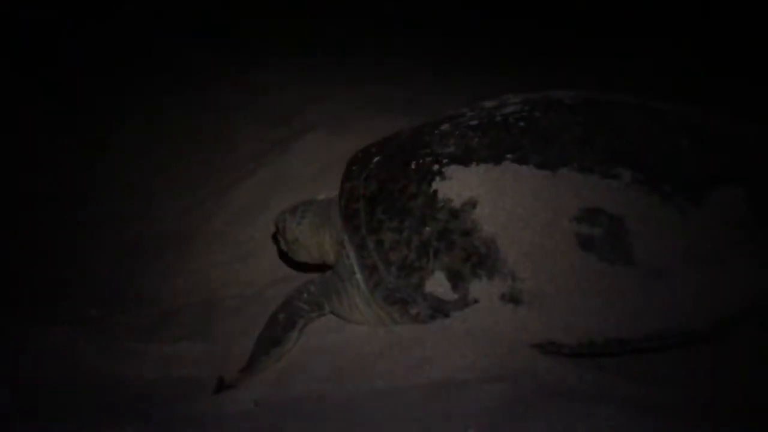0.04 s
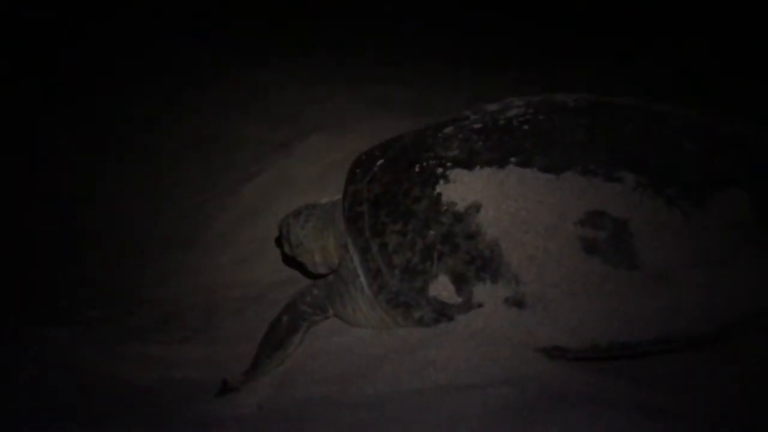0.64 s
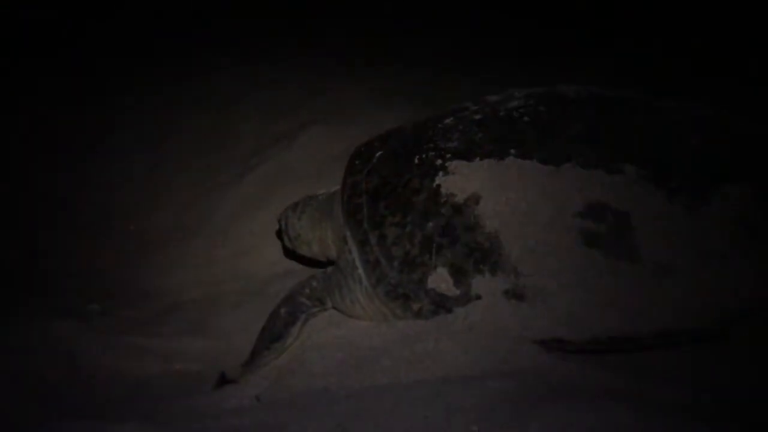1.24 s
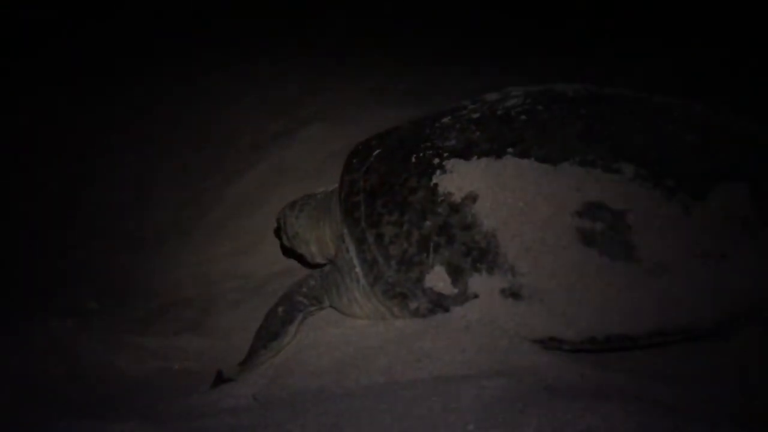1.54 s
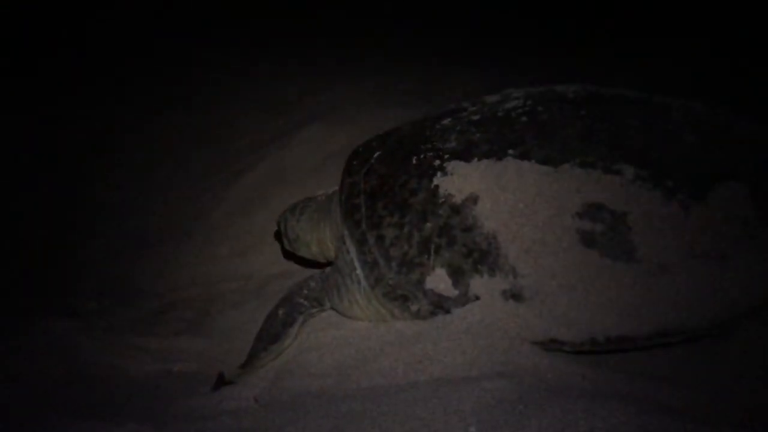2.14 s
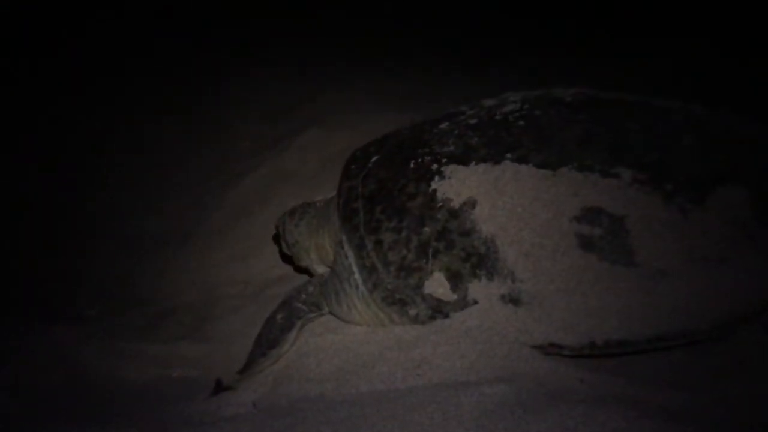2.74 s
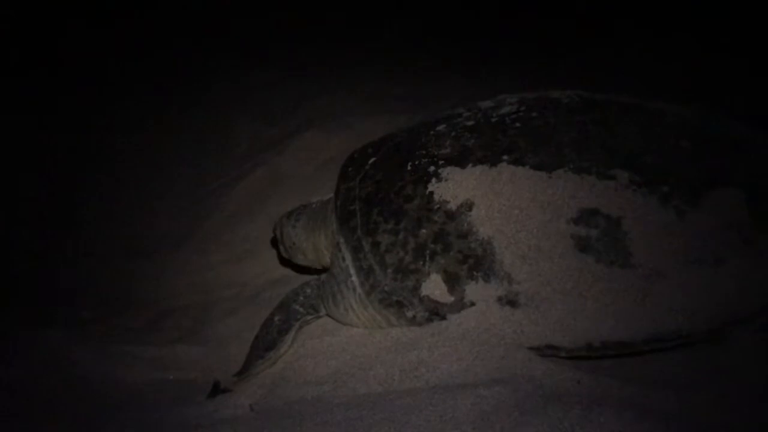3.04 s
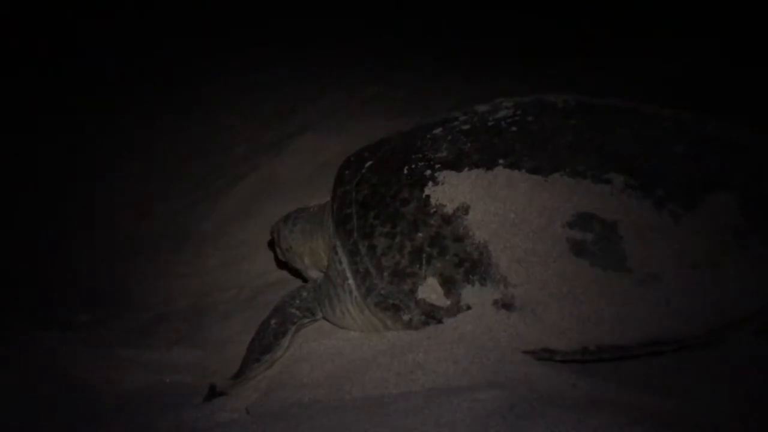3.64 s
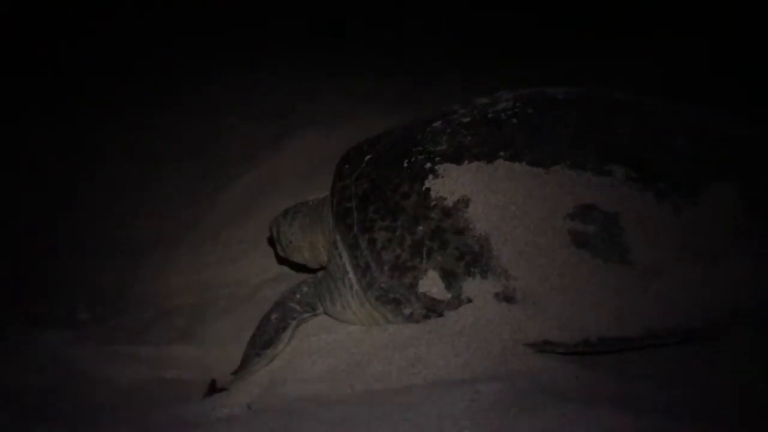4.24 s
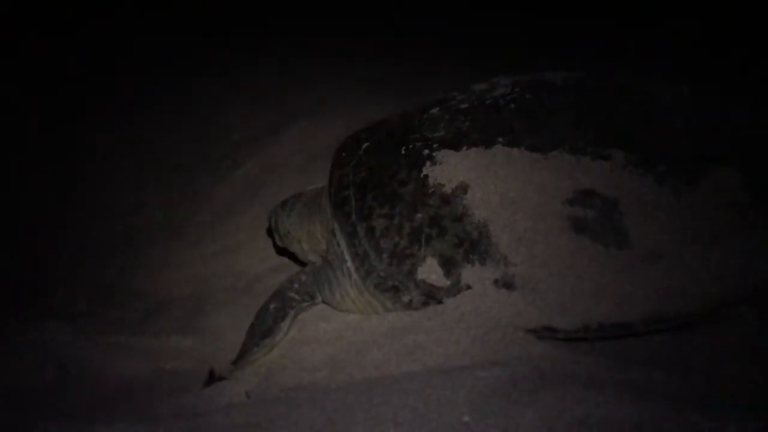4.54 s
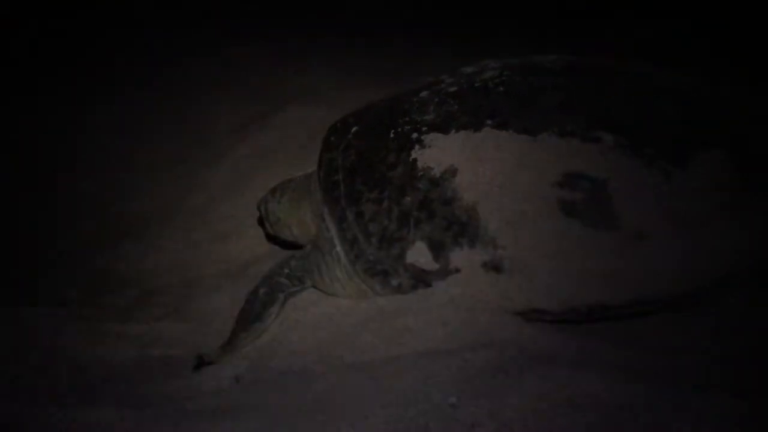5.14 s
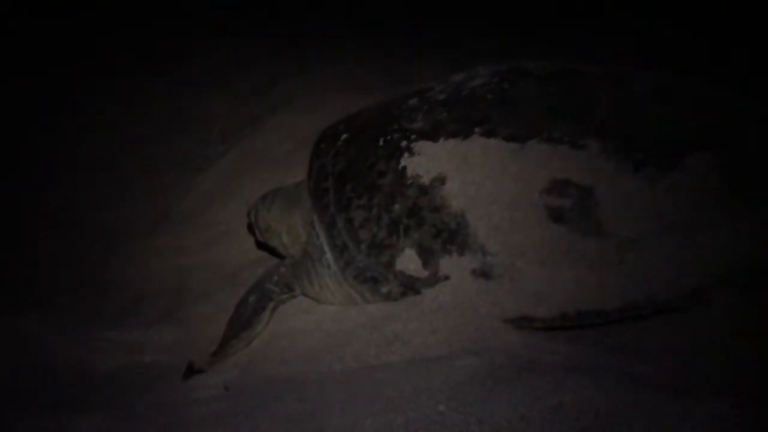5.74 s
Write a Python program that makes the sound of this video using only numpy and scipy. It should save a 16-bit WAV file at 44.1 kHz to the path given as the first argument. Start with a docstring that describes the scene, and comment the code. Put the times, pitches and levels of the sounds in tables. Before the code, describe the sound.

Surf breaks on a sandy beach at night, heard from up the shore. A distant breaker thuds first, along with one soft bump close to the microphone. Foam washes up the sand, then nearer waves spill with a low roar and deep thuds before draining away. Faint microphone hiss and pairs of small dry ticks continue throughout.

```python
"""Surf breaks on a sandy beach at night, heard from up the shore: a far breaker thuds, then
a nearer one spills, roars and drains away. Falling crests trap air: the bubble cloud booms,
its large bubbles roar and lumps of water plunge. Foam washes up the sand and spray hisses.
There is one soft bump close by, and the camera adds its own hiss and faint ticking."""
import sys
import numpy as np
from scipy import signal
from scipy.fft import rfft, irfft, next_fast_len
from scipy.io import wavfile
from scipy.ndimage import uniform_filter1d, map_coordinates

SR = 44100
rng = np.random.default_rng(int(sys.argv[2]) if len(sys.argv) > 2 else 0)


def transcribe(u):
    """Save the signal u as a 16-bit wav file named by the first command-line argument.

    u: samples, shape (n,) or (channels, n), limited to [-1, 1]; the rate is SR.
    q: integer samples, one column per channel.
    """
    v = np.clip(np.atleast_2d(u).T, -1, 1)
    q = np.round(v * 32767).astype(np.int16)
    wavfile.write(sys.argv[1], SR, q)


N = 254898


# Breaking waves. Each row: crest, rise and drain in seconds, then boom, foam and spray in dB.
WAVES = [(0.3, .9, 0.16, -46, -54.5, -66.5), (0.98, 0.35, 0.43, -40, -79, -90),
         (2.28, 0.22, 1, -58, -50, -84), (3.0, 0.37, 1.0, -37.5, -48.5, -72),
         (4.35, 0.57, 0.33, -36.5, -47.5, -68.5)]
# Bubble cloud and large-bubble spectra. Each row: frequency in Hz, relative density in dB.
BOOM_SPECTRUM = [(20, -26), (31, -24), (42, -5), (52, -2.5), (78, -.5), (120, -1), (170, -1.5), (240, -8.5),
                 (330, -24), (500, -44), (1200, -90)]
ROAR_SPECTRUM = [(90, -28), (190, 1.5), (320, 2.5), (390, -1), (460, -5), (570, -6), (730, -12),
                 (1000, -13), (1600, -32), (4000, -68)]

def breakers():
    """Falling crests trap air: the large bubbles roar, and the whole cloud booms just after."""
    *_, boom_db, foam_db, _ = np.transpose(WAVES)
    boom_gain = surf_gain(boom_db, sea_db=-46, lag_s=0.085) * amp(0.51 * wobble(12))
    boom = boom_gain * coloured(rng.standard_normal(N), BOOM_SPECTRUM)
    roar_db = (boom_db + foam_db) / 2 + 0.5
    roar_gain = surf_gain(roar_db, sea_db=-55) * amp(0.67 * wobble(12))
    return boom + roar_gain * churn(ROAR_SPECTRUM, patchy_db=0.07)


def surf_gain(waves_db, sea_db, lag_s=0):
    """Each wave builds to its crest and drains away, adding its power to the steady sea."""
    power = amp(sea_db) ** 2
    for (crest_s, rise_s, drain_s, *_), db in zip(WAVES, waves_db):
        t = np.arange(N) / SR - crest_s - lag_s
        surge = np.exp(-np.where(t < 0, (t / rise_s) ** 2, t / drain_s))
        power += amp(db) ** 2 * surge
    return np.sqrt(power)


# Falling water. Each row: centre in seconds, level in dB, half width in seconds.
PLUNGES = [(1.004, -36.5, 0.028), (1.152, -38.5, 0.032), (1.823, -37, 0.017), (3.074, -36.5, 0.035),
           (3.345, -38, 0.067), (4.41, -33, 0.022), (4.507, -38, 0.016)]
# Thud spectrum. Each row: frequency in Hz, relative density in dB.
THUD_SPECTRUM = [(20, -30), (45, 0), (70, 1.5), (100, -0.5), (140, -18), (300, -50), (600, -90)]

def plunges():
    """Heavy lumps of water land with deep thuds."""
    gain = sum(amp(db) * swell(centre_s, half_s) for centre_s, db, half_s in PLUNGES)
    return gain * coloured(rng.standard_normal(N), THUD_SPECTRUM)


# Foam and spray spectra. Each row: frequency in Hz, relative density in dB.
FOAM_SPECTRUM = [(350, -31), (620, -6.5), (780, -5), (910, 1), (1050, 0), (1200, -2), (1460, 0.5),
                 (1750, -5), (2000, -10), (2400, -17.5), (2750, -25), (3200, -35), (6000, -77)]
SPRAY_SPECTRUM = [(1500, -24), (2600, 5), (3150, -1.5), (3550, -0.5), (4400, -4), (5000, -10), (6200, -16),
                  (7000, -17.5), (8000, -14), (9500, -21), (15000, -33)]

def swash():
    """Foam runs up the sand; its finest bubbles hiss, surging along with it."""
    *_, foam_db, spray_db = np.transpose(WAVES)
    unrest = amp(0.24 * wobble(9))
    foam = surf_gain(foam_db, sea_db=-52.5) * churn(FOAM_SPECTRUM, patchy_db=0.76)
    spray = surf_gain(spray_db, sea_db=-71.5) * churn(SPRAY_SPECTRUM, patchy_db=0.9)
    return unrest * (foam + spray)


# Finest spray spectrum. Each row: frequency in Hz, relative density in dB.
FIZZ_SPECTRUM = [(3000, -20), (6000, -9), (7900, 1), (9500, -11), (15000, -16)]

def crest_fizz():
    """The last wave throws up fine spray as it crests."""
    return amp(-78.5) * swell(centre_s=4.18, half_s=0.33) * churn(FIZZ_SPECTRUM, patchy_db=3.0)


# Bump resonances. Each row: frequency in Hz, level in dB, T60 in seconds.
BUMP_MODES = [(220, -37, .04), (405, -36, 0.032), (540, -40, 0.022), (684, -41.5, 0.022)]

def bump(start_s=0.9767, attack_s=0.0008):
    """One dull knock close by; the soft contact rounds its onset."""
    track = np.zeros(N)
    knock = ring(BUMP_MODES, scatter_db=0)
    onset = 1 - np.exp(-np.arange(len(knock)) / SR / attack_s)
    add(track, start_s, knock * onset)
    return track


# Tick resonances. Each row: frequency in Hz, relative level in dB, T60 in seconds.
TICK_MODES = [(2970, -1, 0.0036), (6300, -7, .0025), (11200, -6, .0025), (13000, -7, .002),
              (15200, -11, .002)]
# Ticks out of step. Each row: start in seconds, relative level in dB.
STRAY_TICKS = [(2.188, -53), (5.22, -57)]

def camera_ticks(first_s=0.0348, period_s=1.004, gap_s=0.3, tick_db=-51, tock_db=-53):
    """A pair of dry ticks about once a second, plus strays: each a snap with a brief ring."""
    track = np.zeros(N)
    pair_starts = np.arange(first_s, N / SR, period_s)
    ticks = [(start_s, tick_db) for start_s in pair_starts]
    tocks = [(start_s + gap_s, tock_db) for start_s in pair_starts]
    for start_s, db in ticks + tocks + STRAY_TICKS:
        ringing = amp(db + 3.5) * ring(TICK_MODES, scatter_db=0.5)
        add(track, start_s, ringing + amp(db - 3) * snap(t60_s=0.004))
    return track


# Microphone noise and its treble edge. Each row: frequency in Hz, relative density in dB.
HISS_SPECTRUM = [(1000, 1.5), (4000, -4), (6200, 1.5), (7000, -1.5), (8100, 1.5), (9100, -3), (10000, -1),
                 (10400, -6.5), (10900, -3), (12500, -1.5), (13500, 1.5), (14600, 3), (15200, -1),
                 (15700, -3.5)]
EDGE_SPECTRUM = [(11500, -25), (13200, 0), (14500, 0), (15500, -15)]

def camera_hiss(fade_centre_s=2.2, fade_s=0.3):
    """Steady microphone self-noise, topped by a thin edge that fades out."""
    hiss = amp(-72.5) * churn(HISS_SPECTRUM, patchy_db=1.0)
    fade = np.clip((fade_centre_s - np.arange(N) / SR) / fade_s + 0.5, 0, 1)
    return hiss + amp(-82.5) * fade * coloured(rng.standard_normal(N), EDGE_SPECTRUM)


# Patter spectrum. Each row: frequency in Hz, relative density in dB.
PATTER_SPECTRUM = [(9000, -16), (11500, -6.5), (13400, -1), (15500, -10)]

def camera_patter(first_s=0.027, period_s=0.05):
    """A very faint, regular train of high snaps."""
    track = np.zeros(N)
    for start_s in np.arange(first_s, N / SR, period_s):
        add(track, start_s, snap(t60_s=0.0066))
    return amp(-85) * coloured(track, PATTER_SPECTRUM)


def churn(spectrum, patchy_db):
    """Noise in which patches come and go, as swarms of like-sized bubbles do."""
    bins = signal.stft(rng.standard_normal(N), nperseg=1024)[2]
    patches = uniform_filter1d(rng.standard_normal(bins.shape), size=7, axis=0)  # across frequency
    patches = uniform_filter1d(patches, size=9, axis=1)  # across time
    noise = signal.istft(bins * amp(patchy_db * unit(patches)), nperseg=1024)[1][:N]
    return coloured(noise, spectrum)


def ring(modes, scatter_db):
    """Struck, damped modes with random scatter in strength."""
    t = np.arange(SR // 10) / SR
    return sum(amp(db + scatter_db * rng.standard_normal() - 60 * t / t60_s) * np.sin(2 * np.pi * hz * t)
               for hz, db, t60_s in modes)


def snap(t60_s):
    """A dry, decaying noise burst."""
    t = np.arange(SR // 10) / SR
    return rng.standard_normal(len(t)) * amp(-60 * t / t60_s)


def swell(centre_s, half_s):
    """A bell-shaped rise and fall."""
    return np.exp(-0.5 * ((np.arange(N) / SR - centre_s) / half_s) ** 2)


def wobble(rate_hz):
    """A smooth curve through random knots."""
    knots = rng.standard_normal(int(N * rate_hz / SR) + 4)
    return map_coordinates(knots, [np.arange(N) * rate_hz / SR])


def coloured(x, spectrum):
    """x shaped by a spectrum on a log frequency axis, at rms 1."""
    points_hz, db = np.transpose(spectrum)
    return unit(filtered(x, lambda hz: amp(np.interp(np.log(hz + 1), np.log(points_hz), db))))


def filtered(x, response):
    """x through a frequency response."""
    size = next_fast_len(N + SR // 2)
    return irfft(rfft(x, size) * response(np.fft.rfftfreq(size, 1 / SR)), size)[:N]


def add(track, start_s, sound):
    """Mix a sound into the track."""
    part = track[max(round(start_s * SR), 0):][:len(sound)]
    part += sound[:len(part)]


def amp(db):
    """Decibels to gain."""
    return 10 ** (np.asarray(db) / 20)


def unit(x):
    """Scale to rms 1."""
    return x / np.sqrt(np.mean(x ** 2) + 1e-20)


def scene():
    """The surf and the small sounds close by, in mono."""
    surf = breakers() + plunges() + swash() + crest_fizz()
    return (surf + bump() + camera_ticks() + camera_hiss() + camera_patter())[None]


def record(dry):
    """The camera passes nothing above its band limit."""
    limit_hz = 15830
    return filtered(dry[0], lambda hz: hz < limit_hz)[None]


dry = scene()
out = record(dry)
transcribe(out)
```